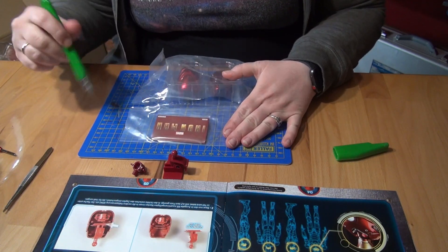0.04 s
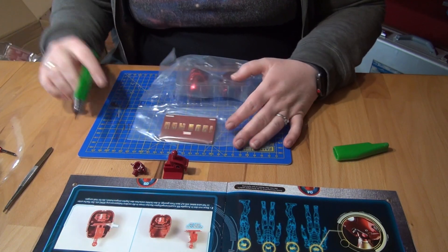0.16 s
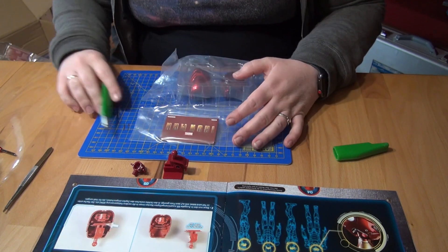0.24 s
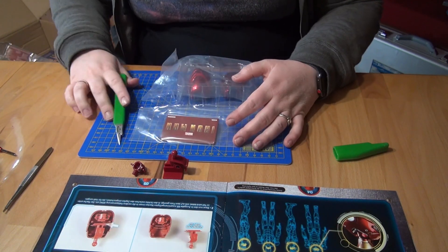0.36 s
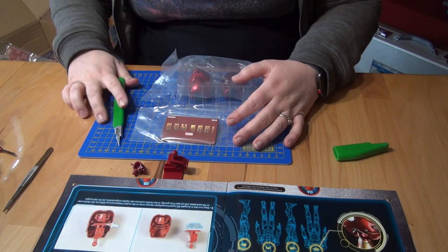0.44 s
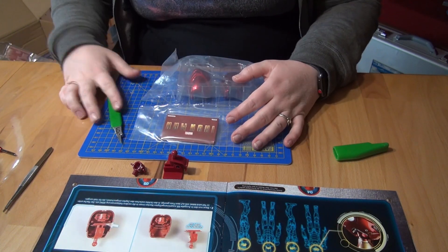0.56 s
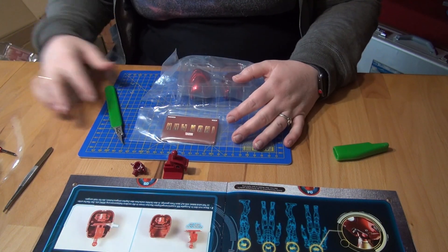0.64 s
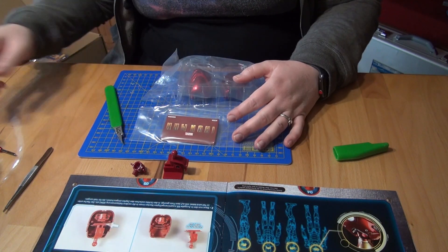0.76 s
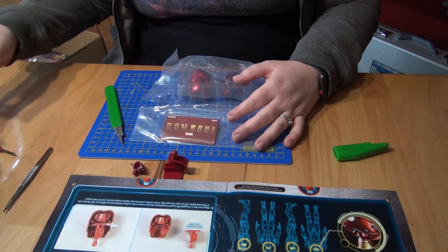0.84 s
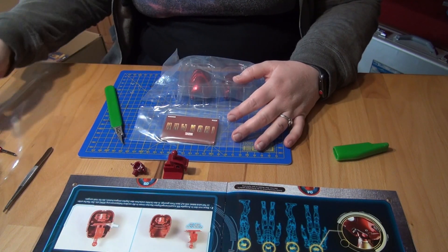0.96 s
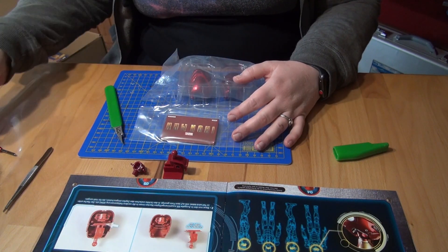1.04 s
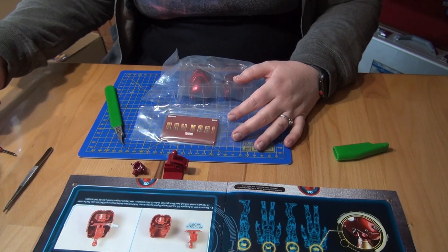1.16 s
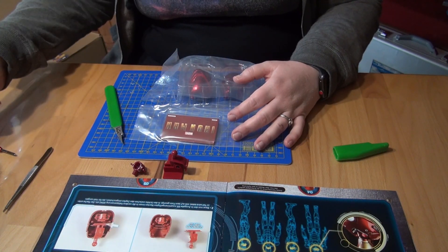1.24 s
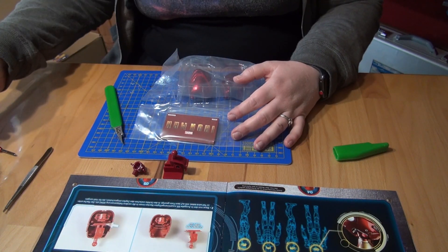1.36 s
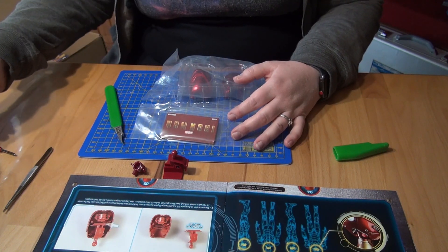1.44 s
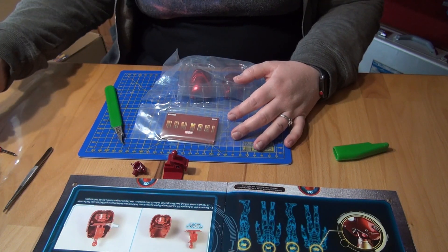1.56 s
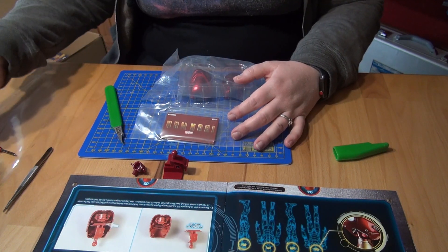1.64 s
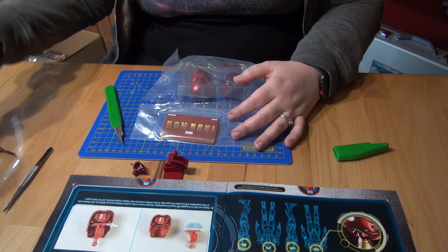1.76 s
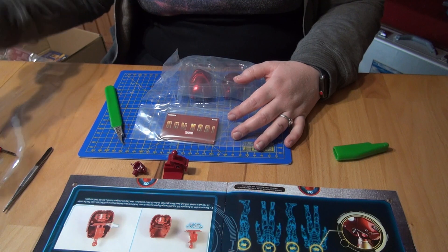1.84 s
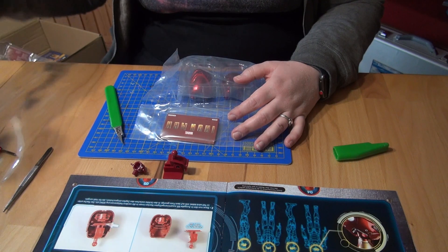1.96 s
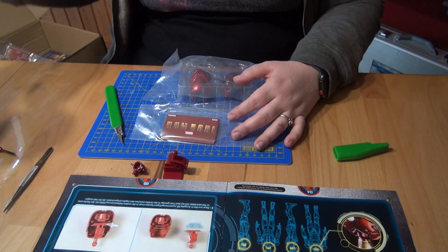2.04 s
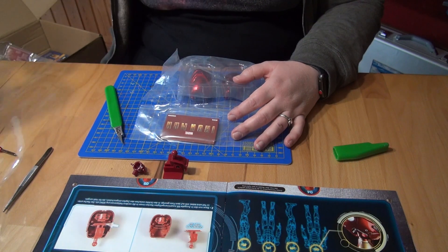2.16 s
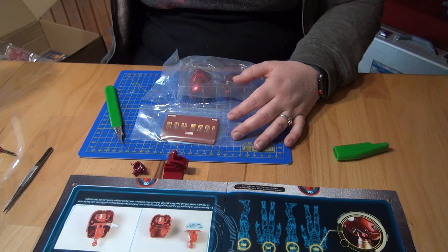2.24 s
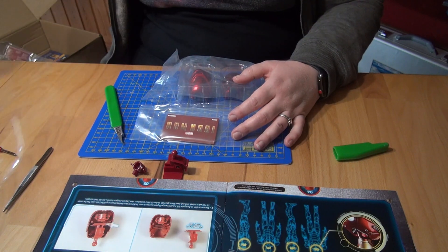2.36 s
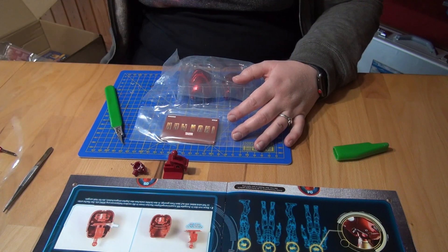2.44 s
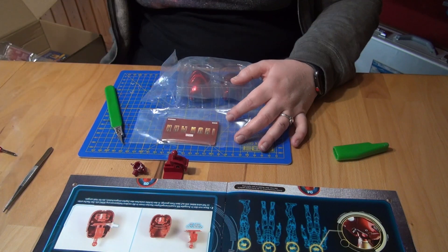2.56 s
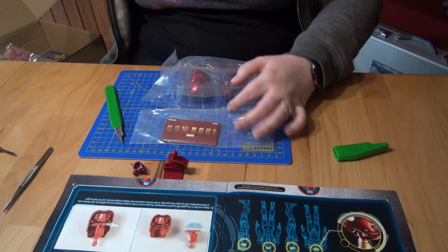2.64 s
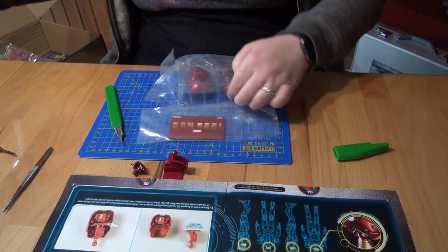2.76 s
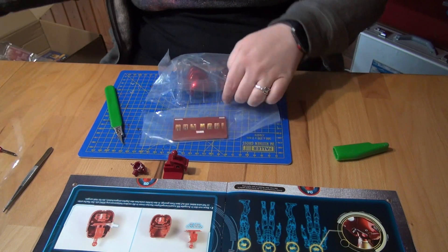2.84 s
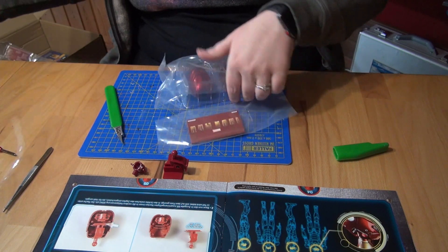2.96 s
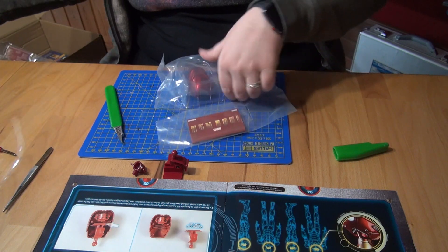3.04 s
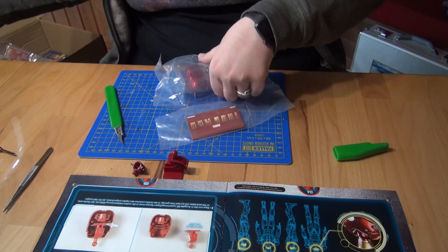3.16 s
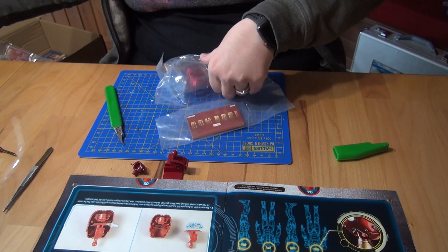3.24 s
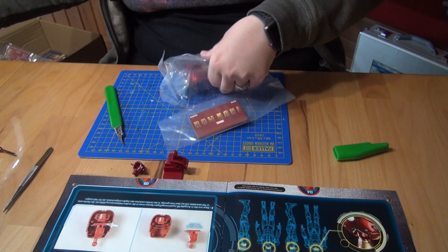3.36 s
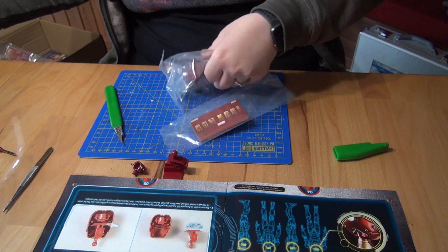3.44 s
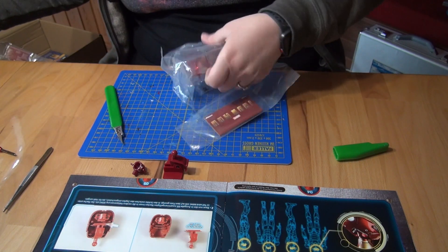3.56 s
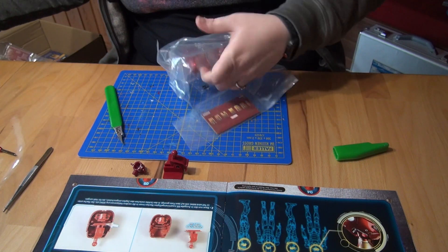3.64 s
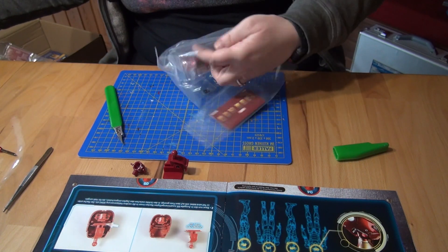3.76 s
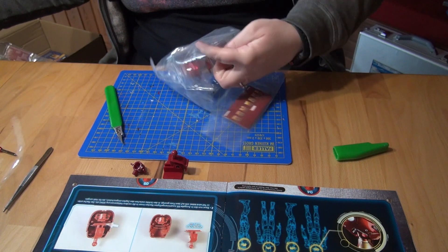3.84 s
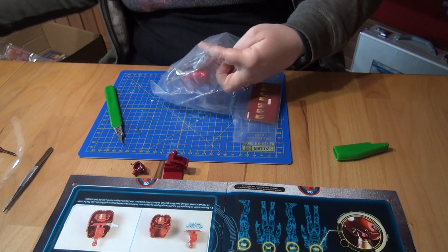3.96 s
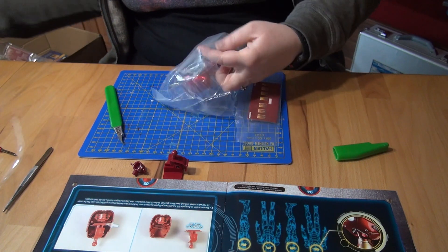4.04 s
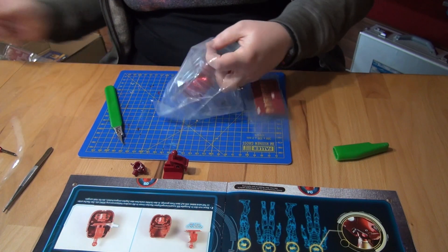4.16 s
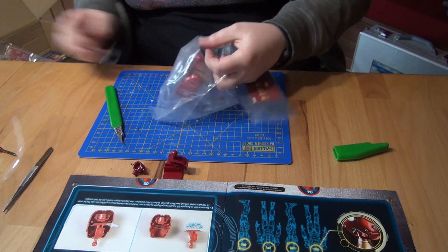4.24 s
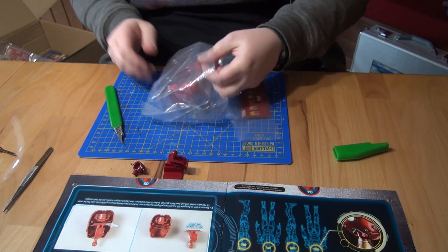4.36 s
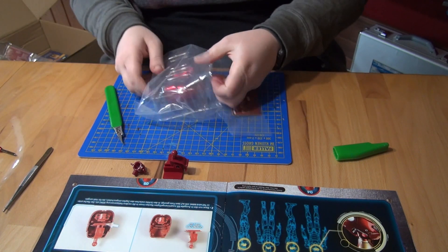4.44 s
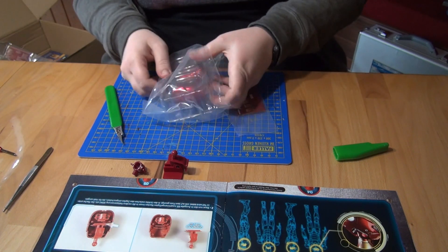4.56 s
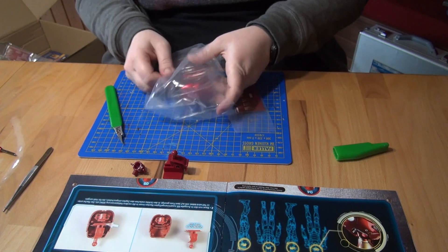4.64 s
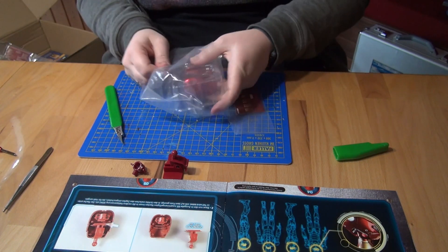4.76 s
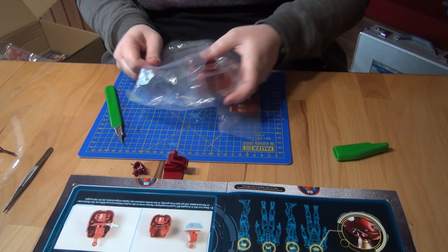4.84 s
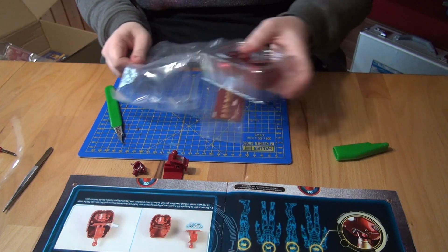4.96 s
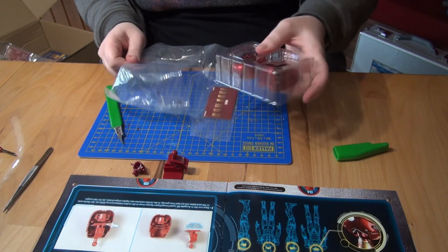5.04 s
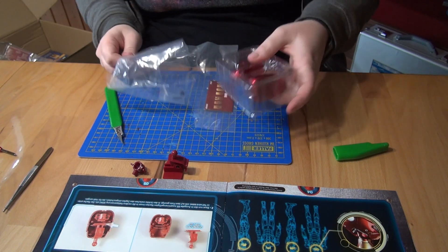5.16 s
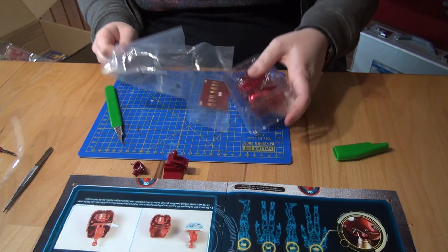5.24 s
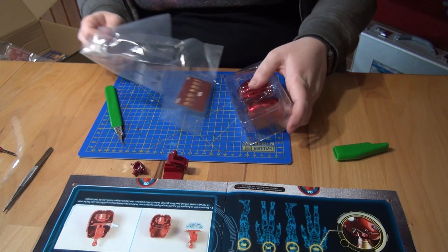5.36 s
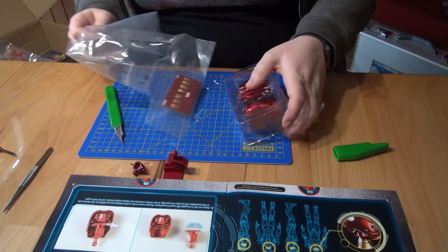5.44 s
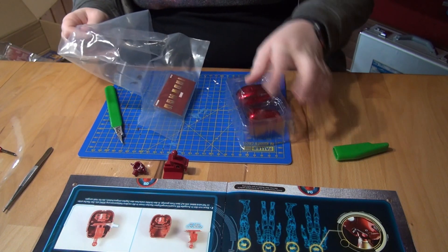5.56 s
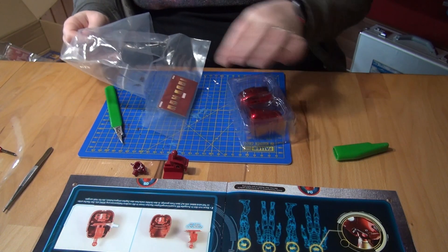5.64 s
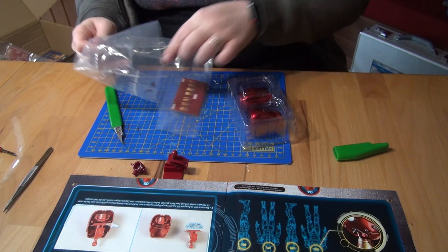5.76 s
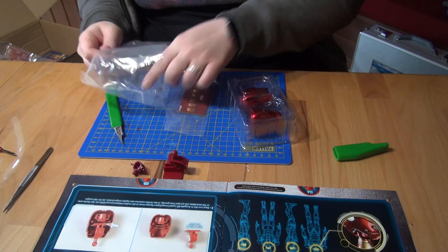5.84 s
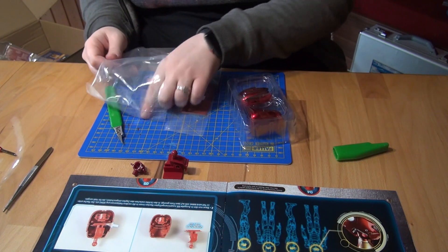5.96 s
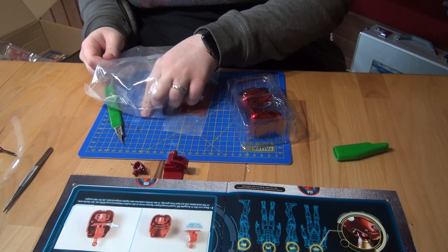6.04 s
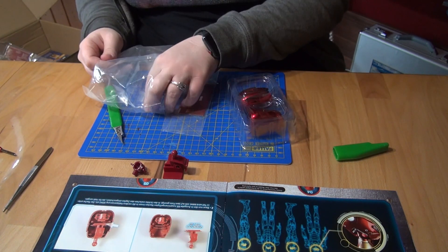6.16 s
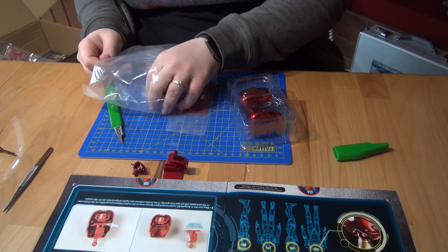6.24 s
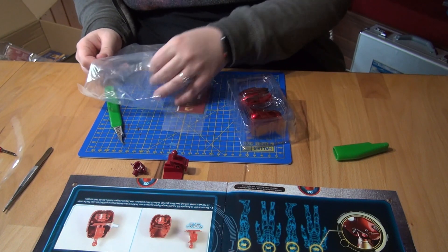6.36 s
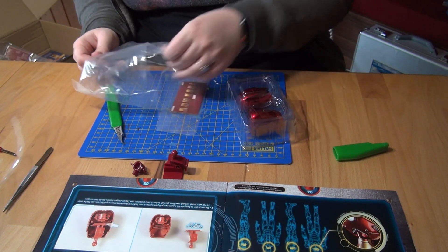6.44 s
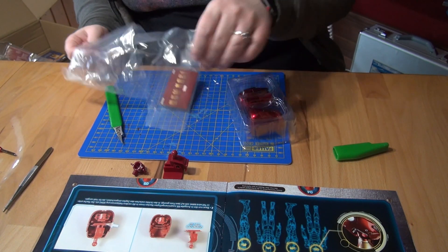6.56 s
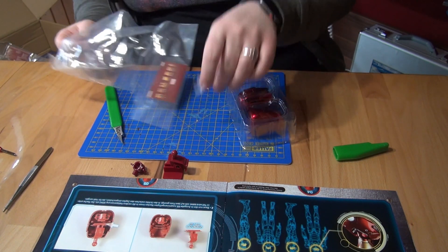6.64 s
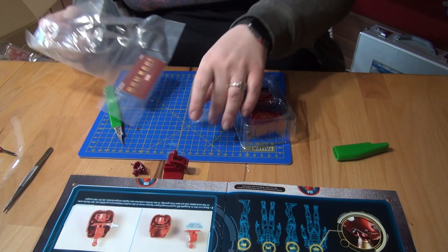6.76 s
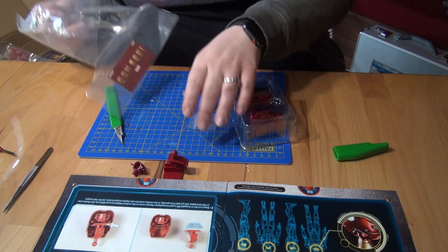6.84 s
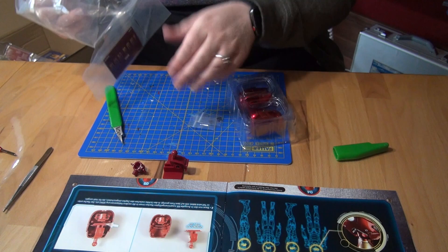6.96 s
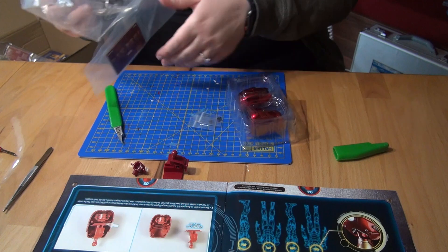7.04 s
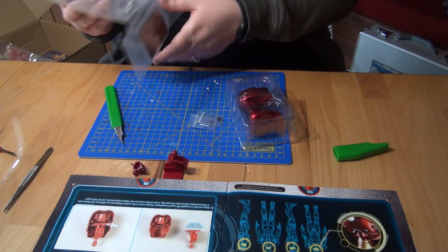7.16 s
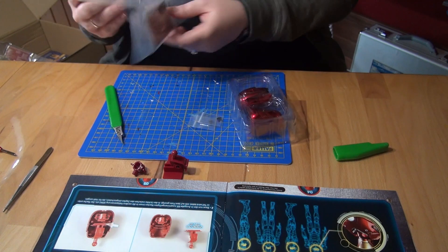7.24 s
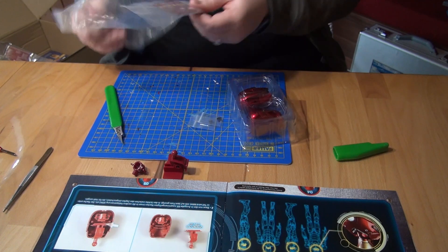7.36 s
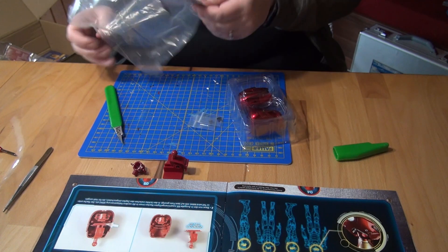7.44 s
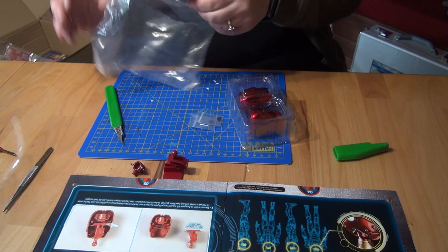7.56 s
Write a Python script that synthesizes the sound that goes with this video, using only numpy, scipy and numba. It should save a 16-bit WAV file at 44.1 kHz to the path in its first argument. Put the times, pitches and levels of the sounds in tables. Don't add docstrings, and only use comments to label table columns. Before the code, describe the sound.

A hard double clack as a knife handle lands on a mat, then almost two seconds of near silence. A thin bag starts to crinkle, buckling into hollow pops, bright ticks and dense rustle with dull table thumps. The handling peaks several times, then thins to scattered crackles. Close stereo microphone, small dry quiet room with faint hiss.

```python
import sys
import numpy as np
from scipy import signal
from scipy.fft import rfft, irfft
from scipy.io import wavfile
from scipy.ndimage import uniform_filter1d
from numba import njit

SR = 44100
rng = np.random.default_rng(int(sys.argv[2]) if len(sys.argv) > 2 else 0)


def field_ratio(decibels):
    return 10 ** (np.asarray(decibels, dtype=float) / 20)


def wav_out(sig):
    wavfile.write(sys.argv[1], SR, np.round(np.clip(np.atleast_2d(sig).T, -1, 1) * 32767).astype(np.int16))


N = 335601

# frequency in Hz, density in dB per Hz.
QUIET_COLOUR = [(12, -31.5), (40, 11), (98, 8), (400, -6.5), (700, -4), (985, -8), (1250, -8.5), (1500, -3),
                (1750, -5), (2210, -10.5), (4550, -15.5), (6910, -14), (14300, -18), (15500, -15)]
QUIET_DB = -65
WHINE_HZ, WHINE_DB = 15625, -89
# start in seconds, pitch in Hz,
# level in dB, t60 in seconds.
PINGS = [(3.562, 6720, -33, 0.11), (4.692, 1945, -16, 0.045), (3.553, 7350, -33, 0.025),
         (5.533, 5400, -14.5, 0.036), (0.472, 1780, -46, 0.15), (4.94, 190, -30, 0.12),
         (7.38, 260, -40.5, 0.3), (5.548, 780, -15.5, 0.13), (3.55, 118, -27.5, 0.32),
         (6.27, 294, -19, 0.074), (0.49, 300, -54.5, 1.5), (3.46, 45, -44, 0.2), (4.215, 32, -38, 0.2)]

# frequency in Hz, level in dB, t60 in seconds.
TABLE_MODES = [(130.3, -3.5, 0.049), (189, -4.5, 0.027), (248, 3, 0.025), (310, 1, 0.017)]
# start in seconds, level in dB, t60 in seconds.
THUMPS = [(.42, -40, 0.2), (0.536, -30, 0.457), (1.48, -45, 0.18), (2.74, -45, 0.2), (3.22, -38, 0.14),
          (3.47, -32, 0.098), (3.55, -27, 0.26), (3.64, -41, 0.19), (4.22, -48, .15), (4.68, -55, 0.126),
          (4.94, -27.5, 0.17), (5.308, -30.5, 0.11), (5.58, -31, 0.35), (6.269, -26.5, 0.11),
          (6.8, -47, 0.34), (7.03, -41, 0.12), (7.2, -55, 0.14)]
TABLE_DB, TABLE_PER_EFFORT = -50.5, 0.62

# start in seconds, peak in dB, treble in dB below it, rattle t60 in seconds.
KNOCKS = [
    (0.387, -36, -34, 0.12),
    (0.4162, -9, -40, 0.046),
    (0.531, -6, -21, 0.11),
    (2.03, -29.5, -15, 0.098),
]
# frequency in Hz, level in dB, t60 in seconds.
KNIFE_MODES = [(317, -14.5, 0.034), (710, -9.5, 0.011), (1300, -9, 0.0094), (1753, -3, 0.022),
               (2650, -4.5, 0.0061), (3230, -2, 0.008), (4900, -9.5, 0.0042)]

# start in seconds, length in seconds, level in dB.
SLIDES = [(0.0, 0.26, -72), (0.56, 0.45, -69), (2.88, 0.058, -64), (3.06, 0.14, -62), (3.213, 0.034, -58),
          (3.667, 0.052, -53), (3.85, 0.088, -51)]
SLIDE_STOP_S = 0.03
# start in
# seconds, length in seconds, tray in dB, film in dB.
DRAGS = [(0.117, 0.1, -45.5, -61), (0.2, 0.051, -54.5, -67), (0.522, 0.008, -34, -57),
         (0.403, 0.014, -50, -55.5), (2.553, 0.12, -58, -63), (2.75, 0.089, -45.5, -59),
         (3.083, 0.055, -42, -53), (3.347, 0.066, -35, -42.5), (4.418, 0.057, -35, -49.5),
         (4.532, 0.053, -47, -46), (4.655, 0.065, -44, -56), (4.796, 0.16, -31.5, -40),
         (6.314, 0.019, -45, -46.5), (5.433, 0.015, -32.5, -42), (5.481, 0.023, -27.5, -36.5),
         (5.522, 0.021, -19, -26.5), (5.575, 0.013, -24, -45), (5.949, 0.059, -33.5, -47),
         (7.199, 0.091, -53.5, -52), (7.375, 0.095, -39, -50)]
DRAG_STOP_S = 0.0052
SWELL_SHARE = 0.26

# frequency in Hz, density in dB per Hz.
TRAY_COLOUR = [(120, -51), (200, -5.5), (293, -1), (373, -14), (430, 1.5), (650, 0), (1400, 0.5),
               (3300, -9), (4200, -15), (5460, -59.5), (9240, -120)]
FILM_COLOUR = [(1760, -31), (3000, 1.5), (3360, -1.5), (3940, -10), (4260, -7.5), (4930, -7.5), (5520, -6),
               (5800, -4), (7460, -10), (9200, -4.5), (10400, -14.5), (12300, -7.5), (14100, -20),
               (15100, -20), (16000, -19.5)]
# time in seconds, effort in dB.
RESTING = [(0.0, -45.5), (0.292, -54), (0.558, -48.5), (1.06, -60), (1.7, -72.5)]
WORKING = [(2.45, -73), (2.94, -45.5), (3.17, -48), (3.4, -48), (3.56, -25), (3.7, -46.5), (3.99, -45),
           (4.27, -33), (4.89, -33.5), (5.08, -41.5), (5.35, -43.5), (5.51, -25.5), (5.75, -43),
           (6.13, -42.5), (6.56, -58.5), (7.15, -58), (7.34, -39.5), (7.61, -54.5)]
FILM_DB, FILM_PER_EFFORT = -52.5, 0.67

# start in seconds, peak in dB, pitch in Hz.
BLOWS = [(0.4203, -14.5, 1760), (0.423, -17, 1760), (4.573, -12, 7500), (4.6368, -16, 8000),
         (6.272, -10, 450), (6.375, -34, 300), (0.741, -39, 1300), (3.228, -30, 8000), (3.243, -34, 8500),
         (3.046, -36, 9000), (3.693, -40, 7200), (5.583, -2.5, 1150), (5.668, -22, 890), (6.849, -25, 1006)]
# start in seconds, peak in dB, pitch in Hz.
CLICKS = [(0.0161, -22.5, 1500), (0.083, -43, 2520), (0.1954, -22, 2000), (2.7497, -23, 1940),
          (2.8976, -18, 2400), (2.9861, -22, 2170), (3.2194, -14.5, 3070), (3.361, -17, 2180),
          (3.4053, -18, 2000), (3.446, -13, 2500), (3.5336, -21, 1940), (3.555, -14, 1900),
          (3.924, -32, 1950), (3.9685, -19.5, 2180), (4.064, -19, 1970), (4.155, -14.5, 3320),
          (4.2241, -16.5, 1970), (4.383, -32, 2700), (4.456, -17, 1950), (4.5446, -28, 2240),
          (4.5728, -19, 2360), (4.6359, -20, 2260), (4.6678, -29, 3350), (4.679, -18, 1910),
          (4.6964, -9, 1870), (4.796, -14, 2220), (4.8325, -15, 2170), (4.852, -8, 3380), (4.864, -8, 1500),
          (4.905, -10, 1920), (4.943, -5.5, 2130), (5.289, -28, 1950), (5.3244, -26, 1950),
          (5.3529, -22, 1880), (5.3683, -29, 1900), (5.414, -28, 2280), (5.44, -17, 1900),
          (5.4502, -14, 2210), (5.4715, -11.5, 2250), (5.4879, -18, 1920), (5.505, -17, 2190),
          (5.5291, -8, 1950), (5.547, -6, 2010), (5.8233, -26.5, 3420), (5.97, -26, 2010),
          (6.0594, -18, 3230), (6.222, -20, 2290), (6.261, -19, 2250), (6.2707, -14.5, 2050),
          (6.3005, -16, 2090), (6.6042, -35, 1930), (6.625, -30, 2050), (6.8026, -26, 2390),
          (6.8163, -21, 3030), (6.8357, -12.5, 2520), (6.91, -41, 2400), (7.0327, -33.5, 1890),
          (7.1711, -29, 2000), (7.1965, -12, 2380), (7.3945, -20, 2290)]
# start in seconds, peak in dB, pitch in Hz.
KNUCKLES = [(0.081, -30, 439), (2.866, -33, 458), (3.026, -34, 678), (3.277, -20.5, 1260),
            (3.351, -32, 883), (3.404, -26, 1430), (3.463, -18, 891), (3.546, -4.5, 1140),
            (3.554, -17, 1480), (3.568, -26, 520), (3.654, -21, 1290), (3.937, -18, 1370),
            (3.993, -20.5, 1250), (4.084, -20, 764), (4.254, -24, 674), (4.464, -21, 942),
            (4.548, -26.5, 724), (4.636, -17, 1410), (4.863, -14, 830), (5.029, -28, 1240),
            (5.091, -26, 1220), (5.414, -17, 1250), (5.451, -27, 714), (5.497, -34, 786),
            (5.511, -13, 1570), (5.544, -6, 1350), (5.577, -9, 680), (5.587, -7.5, 905),
            (5.639, -13.5, 727), (6.604, -32, 1230), (7.209, -27, 530)]

# start in seconds, peak
# in dB, centre in Hz.
TICKS = [(0.194, -30, 5320), (2.75, -29, 6500), (2.8988, -28, 4820), (2.9224, -31, 8520),
         (2.9397, -25, 9200), (2.9852, -29, 8400), (3.045, -46, 12300), (3.163, -27, 4940),
         (3.2188, -23.5, 5500), (3.277, -46, 5540), (3.3152, -29, 8600), (3.342, -30, 9590),
         (3.3613, -20.5, 5600), (3.385, -24, 9000), (3.417, -17.5, 6800), (3.444, -22, 6540),
         (3.5427, -13, 9800), (3.64, -14, 5530),
         (3.899, -32, 8800), (3.924, -23.5, 8400), (3.969, -22.5, 6150), (4.0602, -29, 8500),
              (4.156, -27, 4550), (4.2235, -9, 9100), (4.319, -27.5, 5240), (4.4607, -24, 5000),
              (4.4816, -20.5, 6000), (4.572, -10.5, 6300), (4.6347, -17.5, 6530), (4.6684, -16, 9000),
              (4.687, -18, 6100), (4.742, -26, 5330), (4.784, -22, 5300), (4.831, -21.5, 8500),
              (4.8394, -17, 6520), (4.852, -10.5, 5800), (4.871, -10.5, 9050), (4.904, -15.5, 6520),
              (4.942, -11.5, 5960), (4.9594, -14.5, 9700), (5.0868, -30.5, 5230), (5.199, -28, 9410),
         (5.29, -23, 6400), (5.308, -23, 6040), (5.3537, -22.5, 5900), (5.3983, -21.5, 5730),
                  (5.434, -21, 6500), (5.4507, -24, 7050), (5.4715, -20, 8750), (5.4944, -19, 5600),
                  (5.527, -17, 5500), (5.535, -11, 5360), (5.578, -15.5, 5850), (5.6838, -37.5, 5670),
                  (5.84, -25.5, 12400), (5.916, -30, 8660), (5.9975, -21, 8300), (6.0597, -16, 5360),
                  (6.153, -26, 4970),
         (6.222, -21.5, 9200), (6.2422, -17, 8590), (6.2705, -17, 5400), (6.321, -33, 6490),
              (6.329, -24, 6070), (6.4739, -29, 5100), (6.5285, -32, 6560), (6.8032, -22, 8640),
              (6.81, -24, 6180), (6.8177, -21, 9600), (6.835, -19.5, 5660), (7.196, -13.5, 5550),
              (7.352, -31, 8360), (7.4046, -22, 6200), (7.6034, -29.5, 6300),
         (2.576, -46, 8200), (3.1036, -42, 5700), (3.2444, -48, 5320), (3.2854, -30, 5540),
               (3.5326, -30, 12000), (4.6044, -38, 5700), (4.794, -21, 5230), (5.0045, -23, 7700),
               (5.109, -37, 5780), (5.412, -25, 5740), (6.4344, -40, 5450), (7.1616, -44, 8250),
               (7.258, -28, 8580), (7.3216, -34, 5250), (7.3914, -22.5, 5800), (7.413, -22, 6240),
               (7.457, -26.5, 5800),
         (3.63, -18.5, 6000),
]
CRACKLE_DB, CRACKLE_PER_DB = -34, 1.18

# start in seconds, peak in dB, pitch in Hz.
SNAPS = [(0.738, -27, 700), (2.699, -35, 457), (2.734, -25, 1670), (2.896, -22.5, 2380),
         (2.939, -26.5, 780), (2.984, -21.5, 2160), (3.162, -13.5, 977), (3.274, -12.5, 1310),
         (3.308, -14, 1220), (3.336, -13.5, 1230), (3.387, -10.5, 1060), (3.509, -18, 1320),
         (3.641, -2.5, 1360), (4.153, -29, 1256), (4.316, -15.5, 795), (4.572, -16, 1790),
         (4.687, -14, 1614), (4.901, -21, 1110), (5.004, -15.5, 1280), (5.29, -34, 1130),
         (5.494, -13, 1816), (5.577, -10, 1044), (6.058, -25, 1320), (6.242, -24, 1770), (6.27, -8, 440),
         (6.473, -34.5, 1932), (6.835, -22, 2540), (6.847, -26, 2724), (7.312, -23.5, 2070),
         (7.436, -35, 1710)]
POPS = [(0.016, -24.5, 800), (0.239, -32, 540), (1.049, -44.5, 290), (3.364, -18.5, 910), (3.377, -8, 1360),
        (3.444, -7.5, 1060), (3.458, -8, 817), (3.895, -25, 1007), (3.967, -24, 770), (4.176, -17.5, 1045),
        (4.388, -16.5, 1260), (4.48, -15, 689), (4.678, -12.5, 730), (4.742, -15.5, 1570),
        (4.785, -12, 2400), (4.861, -14.5, 1820), (4.91, -11.5, 1127), (5.308, -18, 1100),
        (5.398, -14.5, 1650), (5.469, -17, 818), (5.541, -13, 1410), (5.679, -14, 599), (5.745, -23.5, 730),
        (5.838, -27, 1010), (5.908, -27.5, 752), (6.372, -30, 275), (6.623, -29, 1300), (6.809, -22, 3050),
        (7.195, -20.5, 1374), (7.392, -17, 1570)]
CRUMPLES = [(0.064, -34, 898), (0.129, -47, 700), (0.194, -23.5, 786), (2.619, -38, 263),
            (2.797, -27.5, 703), (3.104, -25.5, 565), (3.219, -15.5, 590), (3.427, -16.5, 1133),
            (3.55, -3, 310), (3.689, -13.5, 269), (3.781, -30.5, 1147), (3.924, -27.5, 1020),
            (4.057, -22, 1190), (4.222, -22.5, 267.5), (4.242, -23, 980), (4.818, -12, 952),
            (4.869, -10, 1820), (4.942, -11.5, 692), (4.958, -14.5, 780), (5.089, -23.5, 1190),
            (5.364, -18, 1224), (5.441, -14, 900), (5.526, -15, 1300), (5.619, -16, 786),
            (5.968, -20, 1080), (5.993, -10, 666), (6.221, -27, 1180), (6.298, -31, 415),
            (6.603, -34.5, 270), (7.17, -31, 756)]
SETTLES = [(2.572, -48, 353), (2.763, -32, 980), (2.828, -29, 770), (3.025, -39, 751), (4.084, -40, 746),
           (6.451, -43, 1450), (6.539, -38, 2440), (6.762, -37.5, 450), (6.928, -37, 760),
           (6.953, -44, 450), (7.033, -34, 520), (7.161, -37, 740), (7.263, -40, 1030), (7.284, -39, 1530),
           (7.523, -40, 1300), (7.603, -25, 2060)]
EXTRA_STEPS = [(3.629, -10, 1410), (3.646, -2, 2050), (5.584, -17, 1300), (6.27, -12.5, 1530)]
# following creases in dB over the peak, their t60 in seconds, first snap in dB above them.
KINDS = [
    (-1.5, 0.05, 9),
    (-0.5, 0.065, 4.5),
    (1, 0.075, -3.5),
]
WASH_DB = -3, -1.5, 2

ROOM_T60_S, ROOM_DAMP, ROOM_DB = 0.17, 0.041, -13.5
BASS_SIDE_HZ, BASS_SIDE_DB = 150, -14.5
DIP_HZ, DIP_WIDTH_HZ, DIP_SHARE = 3830, 440, 0.5


def unit(x):
    return x / np.sqrt(np.mean(x ** 2))


def colour(x, points):
    hz, db = np.transpose(points)
    grid_hz = np.fft.rfftfreq(2048, 1 / SR) + 1
    cepstrum = irfft(np.log(field_ratio(np.interp(np.log(grid_hz), np.log(hz), db))))
    cepstrum[1:1024] *= 2
    cepstrum[1025:] = 0
    impulse = irfft(np.exp(rfft(cepstrum)))[:1024]
    return signal.fftconvolve(x, impulse)[:N]


@njit
def ring(start_s, hz, decay_s, rise_s, size):
    out = np.zeros(N)
    for k in range(len(start_s)):
        z, gap = size[k] + 0j, 1.
        turn = np.exp(2j * np.pi * hz[k] / SR - 1 / (decay_s[k] * SR))
        close = np.exp(-1 / (rise_s[k] * SR))
        i = int(start_s[k] * SR)
        for j in range(i, min(N, i + int(6 * decay_s[k] * SR))):
            z *= turn
            gap *= close
            out[j] += z.imag * (1 - gap)
    return out


def grains(s, hz, size, cycles, rise):
    hz = np.clip(hz, 40, .4 * SR)
    return ring(np.maximum(s, 0), hz, cycles / hz, rise / hz, size)


def strike(s, db, modes):
    chance = rng.standard_normal((len(s), len(modes), 2))
    hz, mode_db, t60_s = np.transpose(modes)
    size = field_ratio(db[:, None] + mode_db + 1.6 * chance[..., 0])
    pitch = hz * (1 + 0.037 * chance[..., 1])
    same = np.ones_like(size)
    start_s = (s[:, None] * same).ravel()
    decay_s = (t60_s / np.log(1000) * same).ravel()
    return ring(start_s, pitch.ravel(), decay_s, .3 / pitch.ravel(), size.ravel())


def swarm(s, db, t60_s, rise_s):
    out, t = np.zeros(N + SR), np.arange(SR // 4) / SR
    events = np.broadcast((s * SR).astype(int), field_ratio(2 * db), np.clip(t60_s, .005, .3), rise_s)
    for start, power, fade_s, up_s in events:
        out[start:start + len(t)] += power * field_ratio(-120 * t / fade_s) * (1 - np.exp(-t / up_s)) ** 2
    return out[:N]


def rustle(count, lo_hz, hi_hz, spread_db, cycles, points, centre_hz, lean_db):
    when, pitch, luck = rng.random((count, 3)).T
    hz = lo_hz * (hi_hz / lo_hz) ** pitch
    lean = lean_db * np.abs(np.log2(hz / centre_hz[(when * N).astype(int)]))
    size = field_ratio(-spread_db * np.log(1 - .999 * luck) - lean) * hz / lo_hz
    return unit(colour(grains(when * N / SR, hz, size, cycles, 0.38), points))


def flutter(rate_hz, depth_db):
    k = int(SR / rate_hz)
    steps = np.repeat(rng.standard_normal(N // k + 1), k)
    return field_ratio(depth_db * uniform_filter1d(steps, k)[:N])


def stroke(t, s, length_s, stop_s):
    swell = np.clip((t - s) / (SWELL_SHARE * length_s), 0, 1) ** 2
    return swell * np.exp(-np.maximum(t - s - length_s, 0) / stop_s)


def quiet():
    mid, side = (unit(colour(rng.standard_normal(N), QUIET_COLOUR)) for _ in range(2))
    return field_ratio(QUIET_DB) * (mid + 0.32 * side * np.array([[1], [-1]]))


def whine(t):
    return field_ratio(WHINE_DB) * np.sin(2 * np.pi * WHINE_HZ * t)


def pings():
    s, hz, db, t60_s = np.transpose(PINGS)
    return ring(s, hz, t60_s / np.log(1000), 1 / hz, field_ratio(db))


def table_top(effort_db):
    table_db = TABLE_DB + TABLE_PER_EFFORT * (effort_db + 39)
    power = field_ratio(2 * table_db) + swarm(*np.transpose(THUMPS), 0.0098)
    when, force = rng.random((900, 2)).T
    return np.sqrt(power) * unit(strike(when * N / SR, 8 * force, TABLE_MODES))


def knife():
    s, db, bright_db, t60_s = np.transpose(KNOCKS)
    s = s + 0.00066
    rattle = swarm(s, db - 14.5, t60_s, 0.0013)
    crack = swarm(s, db + bright_db, 0.66 * t60_s, 0.00035)
    return strike(s, db + 1.5, KNIFE_MODES), rattle, crack


def slides():
    t = np.arange(N) / SR
    power = sum(field_ratio(2 * db) * stroke(t, s, length_s, SLIDE_STOP_S) for s, length_s, db in SLIDES)
    return np.sqrt(power) * unit(colour(rng.standard_normal(N), FILM_COLOUR))


def drags():
    t = np.arange(N) / SR
    out = np.zeros((2, N))
    for s, length_s, tray_db, film_db in DRAGS:
        out += field_ratio(2 * np.array([[tray_db], [film_db]])) * stroke(t, s, length_s, DRAG_STOP_S)
    return out


def blows():
    s, db, hz = np.transpose(BLOWS)
    neighbours = sum(grains(s, hz * ratio, field_ratio(db - 5.5), 1.0, 0.34) for ratio in (0.68, 1.43))
    return grains(s, hz, field_ratio(db), 2.3, 0.38) + neighbours


def clicks():
    s, db, hz = np.transpose(CLICKS + KNUCKLES)
    when, pitch = rng.random((len(s), 6)).T.reshape(2, 3, -1)
    late_s = .0012 + 0.00297 * when ** 2
    size = field_ratio(db - 6.0 - 1830 * late_s)
    near_hz = hz * 2 ** (0.56 * (pitch - .5))
    spike = grains(s + 0.001107, 1.09 * hz, field_ratio(db + 1.0), 0.47, 0.1)
    return spike + grains((s + late_s).ravel(), near_hz.ravel(), size.ravel(), 3.5, 0.49)


def ticks():
    s, db, hz = np.transpose(TICKS)
    when, sign, pitch = rng.random((len(s), 18)).T.reshape(3, 6, -1)
    late_s = .0009 + 0.0024 * when ** 2
    octaves = 2.44 * (pitch - .55)
    size = field_ratio(db + 7.5 - 7100 * late_s - 10.6 * np.abs(octaves)) * np.sign(sign - .5)
    cracks = grains((s + late_s).ravel(), (hz * 2 ** octaves).ravel(), size.ravel(), 1.97, 0.069)
    bounced = cracks + 0.44 * np.roll(cracks, 14)
    return bounced, swarm(s + 0.00022, CRACKLE_DB + CRACKLE_PER_DB * (db + 21.0), 0.033, 0.00026)


def buckles():
    tables = SNAPS + SETTLES, POPS + EXTRA_STEPS, CRUMPLES
    rows = []
    for table, (up_db, t60_s, snap_db), wash_db in zip(tables, KINDS, WASH_DB):
        rows += [(s, db + up_db, hz, t60_s, snap_db, wash_db) for s, db, hz in table]
    return np.transpose(rows)


def pops():
    s, db, hz, t60_s, snap_db, wash_db = buckles()
    s = s + 0.001577
    rise_s = 0.00073 * field_ratio(-1.8 * snap_db)
    when, luck, pitch = rng.random((len(s), 90)).T.reshape(3, 30, -1)
    first = grains(s, hz, field_ratio(db + snap_db - 0.5), 1.12, 0.93)
    late_s, octaves = when * t60_s / 2, 2.37 * (pitch - .3)
    follow_db = db - 12.0 - 16.0 * when + 10.0 * (luck - 0.5) - 3.1 * np.abs(octaves)
    follow = field_ratio(follow_db) * (1 - np.exp(-late_s / rise_s))
    rest = grains((s + late_s).ravel(), (hz * 2 ** octaves).ravel(), follow.ravel(), 1.53, 0.67)
    return first + rest, swarm(s, db + wash_db - 10.0, t60_s, rise_s)


@njit
def walls(x, lags, gain, damp):
    line, soft, out = np.zeros((8, 4096)), np.zeros(8), np.zeros((2, len(x)))
    for i in range(len(x)):
        total = 0.
        for k in range(8):
            soft[k] += (1 - damp) * (gain[k] * line[k, (i - lags[k]) & 4095] - soft[k])
            total += soft[k]
            out[k % 2, i] += soft[k]
        for k in range(8):
            line[k, i & 4095] = x[i] + soft[k] - total / 4
    return out


def room(x):
    lags = (311 * 1.237 ** np.arange(8)).astype(np.int64)
    left, right = walls(x, lags, field_ratio(-60 * lags / SR / ROOM_T60_S), ROOM_DAMP)
    side = left - right
    shade = signal.butter(1, [3800, 7500], "band", fs=SR, output="sos")
    side = 0.15 * side + 0.31 * signal.sosfilt(shade, side)
    return field_ratio(ROOM_DB) * (left + right + side * np.array([[1], [-1]]))


def scene():
    t = np.arange(N) / SR
    tray_db = np.interp(t, *np.transpose(RESTING + WORKING))
    film_db = FILM_DB + FILM_PER_EFFORT * (tray_db + 40)
    panel_hz = np.interp(t, *np.transpose(sorted(SNAPS + POPS + CRUMPLES))[::2])
    (pop, after_pop), (tick, after_tick), (knock, rattle, crack) = pops(), ticks(), knife()
    tray_drag, film_drag = drags()

    busy = np.clip((film_db + 64) / 8, 0, 1)
    cluster = flutter(rate_hz=32, depth_db=5.5) ** busy
    film_cluster = cluster * flutter(rate_hz=35, depth_db=4.5) ** busy
    tray_power = cluster * field_ratio(2 * (tray_db - 7.0)) + after_pop + rattle + tray_drag
    film_power = film_cluster * field_ratio(2 * (film_db - 4.5)) + after_tick + crack + film_drag
    tray = np.sqrt(tray_power) * rustle(
        count=34000, lo_hz=249.5, hi_hz=3810, spread_db=2.5, cycles=2.24,
        points=TRAY_COLOUR, centre_hz=panel_hz, lean_db=3.0)
    film = np.sqrt(film_power) * rustle(
        count=50000, lo_hz=3380, hi_hz=15860, spread_db=2.8, cycles=1.06,
        points=FILM_COLOUR, centre_hz=6 * panel_hz, lean_db=1.0)

    blow = blows()
    near = tray + film + table_top(tray_db) + pop + tick + knock + clicks() + slides() + blow
    near = signal.sosfilt(signal.butter(2, 90, "high", fs=SR, output="sos"), near)
    near = near + pings() + whine(t)
    dip = signal.iirpeak(DIP_HZ, DIP_HZ / DIP_WIDTH_HZ, fs=SR)
    near = near - DIP_SHARE * signal.lfilter(*dip, near)

    wet = room(near - 0.75 * (knock + blow))
    low = signal.butter(1, BASS_SIDE_HZ, fs=SR, output="sos")
    bass = field_ratio(BASS_SIDE_DB) * signal.sosfilt(low, near)
    direct = near * field_ratio(np.array([[.3], [-.3]]))
    return direct + wet + quiet() - bass * np.array([[1], [-1]])


def top_cut(x):
    return signal.sosfilt(signal.butter(12, 17000, fs=SR, output="sos"), x)


def record(dry):
    top = signal.ellip(8, .2, 60, 16000, fs=SR, output="sos")
    mix = signal.sosfilt(top, np.tanh(1.241 * dry) / 0.96)
    return top_cut(mix)


dry = scene()
out = record(dry)
wav_out(out)
```